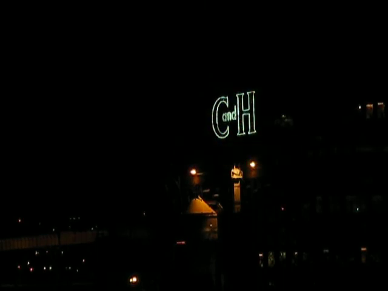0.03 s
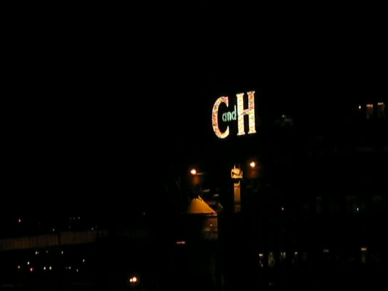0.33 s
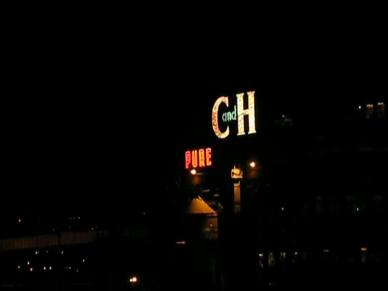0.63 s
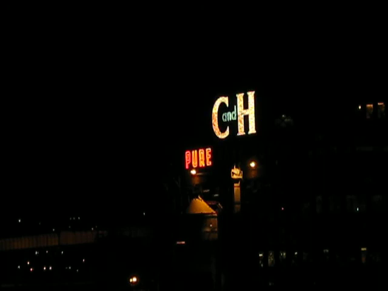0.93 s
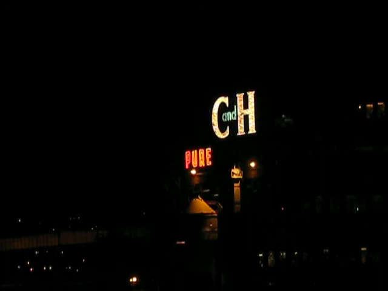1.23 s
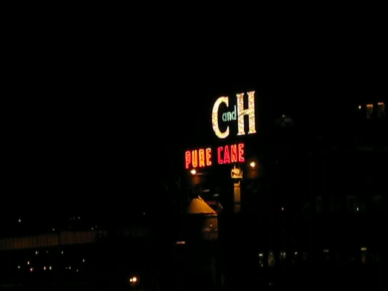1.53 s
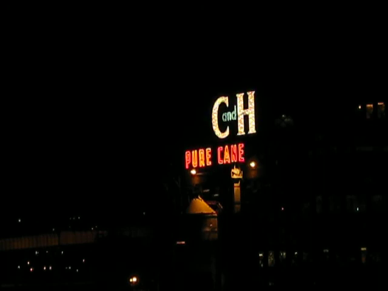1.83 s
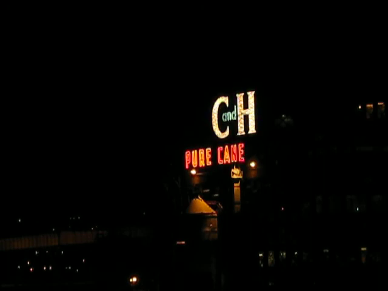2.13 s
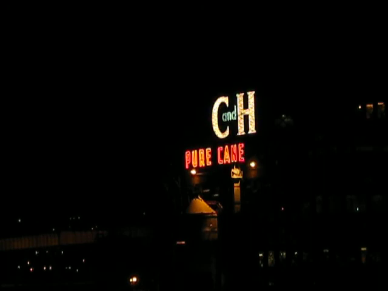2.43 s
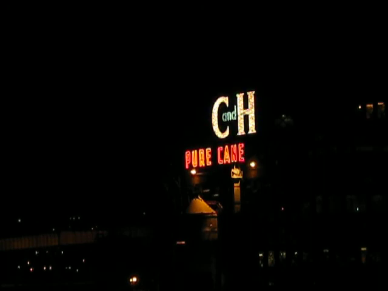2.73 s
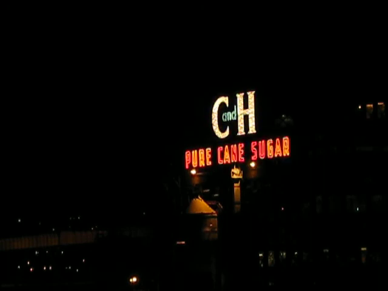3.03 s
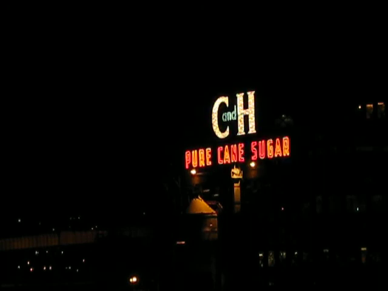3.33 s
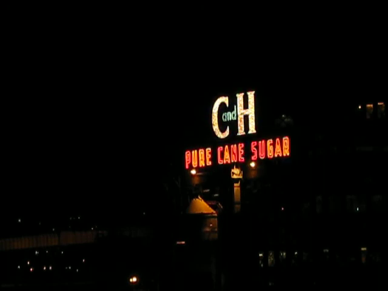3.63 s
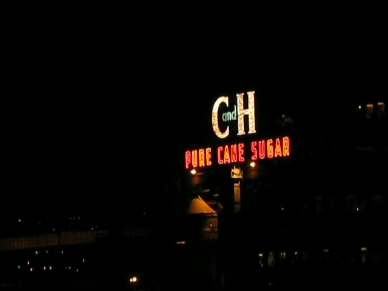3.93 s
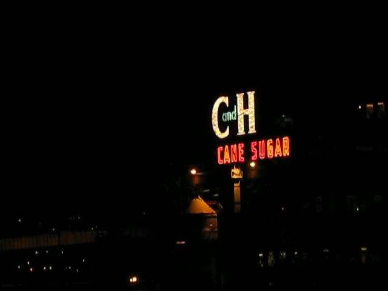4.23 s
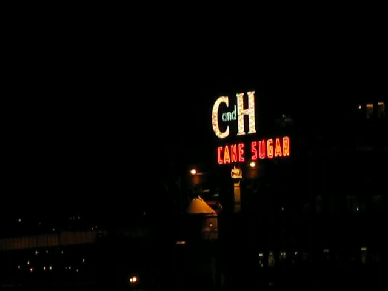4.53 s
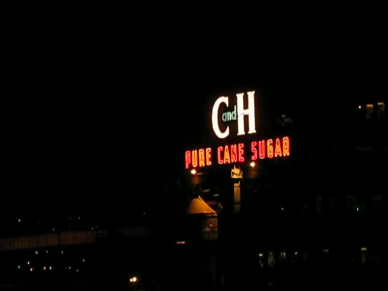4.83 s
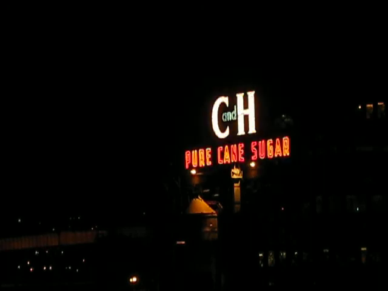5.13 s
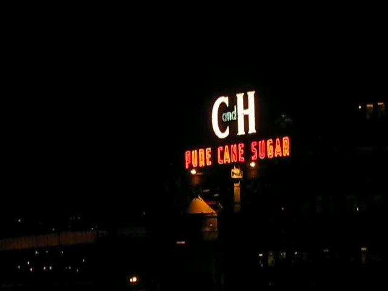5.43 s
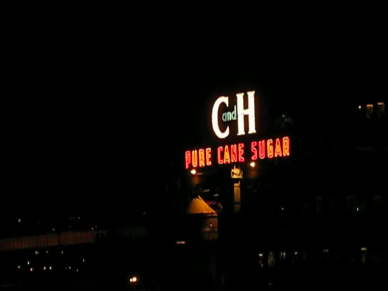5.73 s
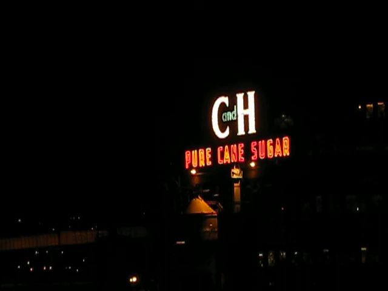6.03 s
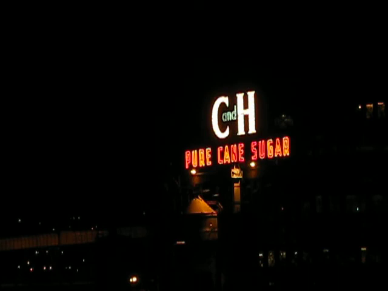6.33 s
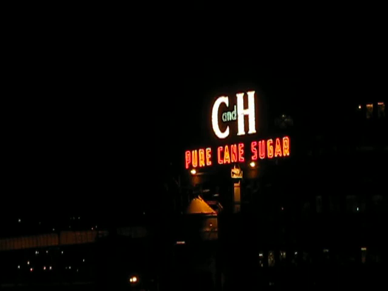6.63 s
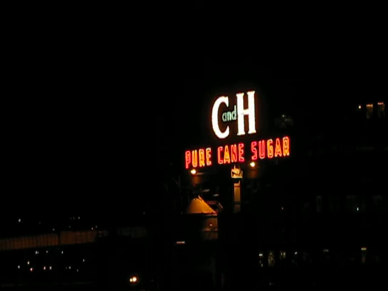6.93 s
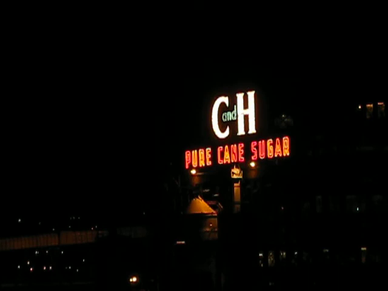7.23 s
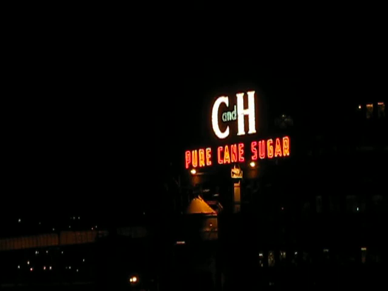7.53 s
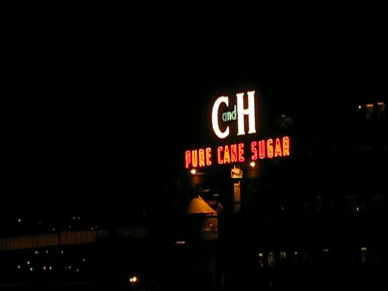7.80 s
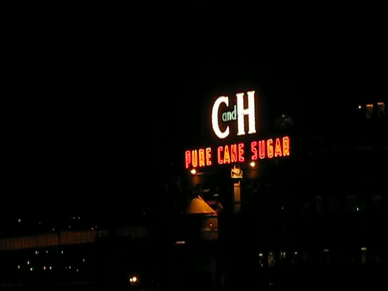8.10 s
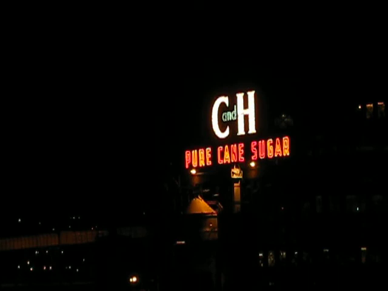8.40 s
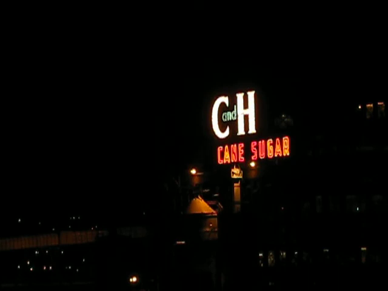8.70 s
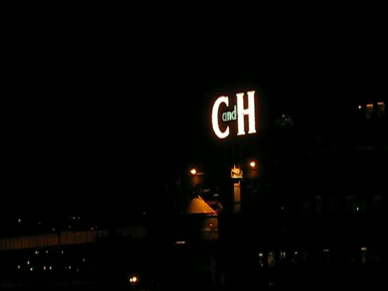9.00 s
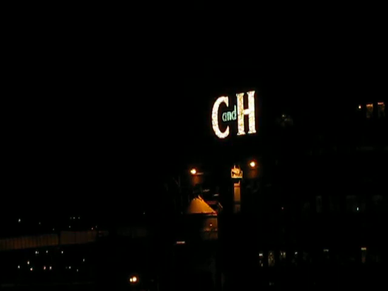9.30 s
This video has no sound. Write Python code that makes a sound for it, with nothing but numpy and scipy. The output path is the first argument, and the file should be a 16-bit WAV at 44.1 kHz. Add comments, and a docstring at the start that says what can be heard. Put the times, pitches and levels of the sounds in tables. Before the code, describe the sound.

A close camera motor whines steadily over a low distant rush of machinery and traffic, with a few faint clicks.

```python
"""Outdoors at night, a factory in the distance, heard from a hand-held tape camera.
Close to the microphone the camera's two motors whine over the rubbing of its gears and tape.
A low beating hum, probably the camera's drive, lies over the dull rush of far plant and traffic.
The plastic case ticks now and then, the picture scan leaks a faint buzz, and the microphone hisses."""
import sys
import numpy as np
from scipy import signal
from scipy.fft import rfft, irfft, next_fast_len
from scipy.io import wavfile
from scipy.ndimage import map_coordinates

SR = 44100
rng = np.random.default_rng(int(sys.argv[2]) if len(sys.argv) > 2 else 0)


def unload_audio(sound):
    """Save the sound as a 16-bit wav file, at the path given as the first command line argument."""
    columns = np.transpose(np.atleast_2d(sound))
    # keep every value between -1 and 1, then stretch to whole-number steps
    steps = np.round(np.clip(columns, -1, 1) * 32767)
    wavfile.write(sys.argv[1], SR, steps.astype(np.int16))


N = 412776


# steady lines: (shaft multiple, level [dB rms])
STEADY_LINES = [(1, -49), (2, -41), (3, -48.5), (4, -45), (5, -52), (8, -51), (9, -40.5), (10, -40),
                (10.5, -45), (11.5, -51), (12.5, -42.5), (16, -46.5), (17, -41), (18, -41.5), (18.5, -48),
                (19, -41), (19.5, -39.6), (20, -48), (21, -51), (24, -48), (25, -51.5)]
# creeping lines: (shaft multiple, start level [dB rms], slope [dB/s])
CREEPING_LINES = [(6, -34.3, -.25), (7, -38, .9), (15, -35, -.5)]
# shaft multiples of the three swelling lines
SWELL_MULTIPLES = (11, 12, 13)
# their levels before flutter: (time [s], low [dB rms], middle [dB rms], high [dB rms])
SWELL_LEVELS = [(0.0, -29, -21.5, -28), (0.4, -29, -25.5, -30.5), (2.0, -30.0, -31.0, -36),
                (2.6, -34, -32, -39), (4.0, -36.0, -29, -32), (4.6, -41.0, -25.5, -26.5),
                (5.2, -35.5, -32.5, -26.5), (5.6, -31, -33.5, -31.0), (6.2, -32, -36.5, -39.5),
                (6.8, -32.5, -32.5, -34.5), (7.6, -37.0, -35, -35.5), (8.6, -33.0, -34.5, -25.5),
                (9.3, -32, -30.5, -25.5)]

def main_motor(shaft_hz=91.245, beat_s=1.406, crest_s=.18, flutter_below_db=-25.5):
    """Lines at multiples of the shaft rate: some creep, one beats, three swell and flutter."""
    t = clock()
    turns = spin(shaft_hz, wow=.00082)
    steady = sum(tone(k * turns, db) for k, db in STEADY_LINES)
    creeping = sum(tone(k * turns, db + db_per_s * t) for k, db, db_per_s in CREEPING_LINES)
    beat = 1 + .5 * np.cos(2 * np.pi * (t - crest_s) / beat_s)
    beating = tone(14 * turns, db=-40) * beat
    times_s, *levels_db = np.transpose(SWELL_LEVELS)
    swelling = 0
    for rank, (k, points_db) in enumerate(zip(SWELL_MULTIPLES, levels_db)):
        db = np.interp(t, times_s, points_db)
        # higher and quieter lines flutter more
        flutter_db = (.09 + .1 * rank) * np.maximum(flutter_below_db - db, 0)
        swelling += tone(k * turns, db + flutter_db * wobble(10))
    return steady + creeping + beating + swelling


# steady lines: (shaft multiple, level [dB rms])
SECOND_MOTOR_LINES = [(1, -54), (2, -44.5), (4, -50), (5, -44.6), (7, -40), (8, -37.5), (10, -51),
                      (11, -38.4), (12, -46), (14, -44), (15, -43.5), (16, -49), (17, -41.5), (18, -45)]

def second_motor(shaft_hz=98.29, ninth_db=-36.5, waver_db=1.9):
    """A slightly faster shaft whose lines beat against the main motor's; the ninth wavers."""
    turns = spin(shaft_hz, wow=.00012)
    ninth = tone(9 * turns, ninth_db + waver_db * wobble(2))
    return ninth + sum(tone(k * turns, db) for k, db in SECOND_MOTOR_LINES)


# gear and tape noise: (frequency [Hz], density [dB/Hz])
GEAR_SPECTRUM = [(200, -92.5), (650, -66), (1150, -60.5), (1450, -65.5), (1850, -63), (2030, -58.5),
                 (2400, -71.5), (2850, -85.5), (3080, -79.5), (3400, -89.5), (3680, -86.5), (4300, -92.5),
                 (5050, -90.5), (6500, -116)]

def gears(teeth_hz=410.6, pulse_depth=.18, waver_db=.84):
    """Rubbing noise that pulses as the teeth mesh."""
    mesh = 1 + pulse_depth * np.sin(2 * np.pi * teeth_hz * clock())
    return noise(GEAR_SPECTRUM) * mesh * amp(waver_db * wobble(8))


# case ticks: (time [s], relative level [dB], ring t60 [s], favoured pitch [Hz])
CASE_TICKS = [(.2696, -12.5, .0095, 4480), (.299, -38.5, .045, 2650), (2.0004, -43, .045, 4100),
              (3.994, -21, 0.029, 3100), (4.2835, -36, .03, 3950), (4.6405, -38, .03, 4300),
              (5.354, -34, .024, 4660), (6.256, -28.5, 0.021, 4700), (6.8047, -28.5, 0.025, 4100),
              (7.109, -41, .03, 3800), (8.482, -34.5, 0.048, 5780), (8.804, -39, .02, 4330)]
# case modes: (frequency [Hz], relative level [dB])
CASE_MODES = [(2080, -7.5), (2230, 7.5), (2620, 6.5), (3100, 1), (3550, -1.5), (3800, -3), (4130, -11.5),
              (4330, -6.5), (4660, -5.5), (5550, -26.5), (5980, -19)]

def case_ticks(gain_db=1, favoured_db=4, crack_db=-10, attack_s=.0003, tail_db=-16, tail_t60_s=.13):
    """Hard plastic gives a little: a crack, brief modes and a weak after-ring."""
    out = np.zeros(N + SR)
    t = np.arange(SR // 5) / SR
    crack_band = signal.butter(2, [2000, 5000], "band", fs=SR, output="sos")
    faint_ticks = [(rng.uniform(0, N / SR), -42.5, .02, rng.uniform(3800, 6000)) for _ in range(4)]
    for start_s, db, t60_s, favoured_hz in CASE_TICKS + faint_ticks:
        ring = 0
        for hz, mode_db in CASE_MODES:
            # modes near the favoured pitch are pulled toward favoured_db, colouring each tick
            nearness = np.exp(-(np.log(hz / favoured_hz) / .08) ** 2)
            ring_db = mode_db + (favoured_db - mode_db) * nearness + rng.standard_normal()
            ring += tone(hz * t, ring_db)
        crack = signal.sosfilt(crack_band, rng.standard_normal(len(t)))
        tick = unit(ring) + amp(crack_db) * unit(crack)
        tail_share = min(t60_s / .026, 1) ** 2  # short snaps leave less after-ring
        tail = tail_share * amp(tail_db - 60 * t / tail_t60_s)
        envelope = (amp(-60 * t / t60_s) + tail) * (1 - np.exp(-t / attack_s))
        out[round(start_s * SR):][:len(t)] += amp(db + gain_db) * envelope * tick
    soft_contact = signal.butter(2, 8000, fs=SR, output="sos")
    return signal.sosfilt(soft_contact, out[:N])


# hum tones: (frequency [Hz], level [dB rms])
HUM_TONES = [(113, -52), (164.9, -44), (168.2, -43.5), (329.7, -45.5), (332.4, -50), (505.4, -51.5)]

def low_hum():
    """Low tones, probably the camera's drive; the close pairs beat."""
    return sum(tone(hz * clock() + .015 * wobble(2), db) for hz, db in HUM_TONES)


# far plant and traffic: (frequency [Hz], density [dB/Hz])
RUSH_SPECTRUM = [(20, -87), (38, -82.5), (52, -73), (65, -70.5), (88, -67), (130, -63.5), (320, -62),
                 (500, -63), (900, -72.5), (2000, -93), (4000, -120)]

def distant_rush(waver_db=.07):
    """Far plant and traffic merge into a dull, nearly steady noise."""
    return noise(RUSH_SPECTRUM) * amp(-waver_db * wobble(3.3))


def scan_buzz(scan_hz=59.94, pip_hz=6786, width_s=.0005):
    """Each picture scan leaks a short high pip with a sharp edge, strong and weak in turn."""
    def pip(t, hz, width_s):
        return np.exp(-(t / width_s) ** 2) * np.cos(2 * np.pi * hz * t)

    def leak(t):
        edge = amp(-48) * pip(t + width_s, hz=7500, width_s=.00012)
        body = amp(-42.5) * pip(t, pip_hz, width_s)
        echo = amp(-53) * pip(t - .0019, pip_hz, 2 * width_s)
        return edge + body + echo

    cycle_s = clock() % (2 / scan_hz)
    return leak(cycle_s - .0033) + amp(-4.5) * leak(cycle_s - .0197)


# microphone hiss: (frequency [Hz], density [dB/Hz])
HISS_SPECTRUM = [(1000, -103), (9500, -104.5), (12000, -105.5), (15500, -111)]

def microphone_hiss():
    """The microphone's steady noise floor."""
    return noise(HISS_SPECTRUM)


def spin(hz, wow, wow_hz=3.3, drift=.00008):
    """Turns of a governed shaft: an off-centre wheel and slow drift bend its speed."""
    wheel = np.sin(2 * np.pi * (wow_hz * clock() + rng.random()))
    speed = 1 + wow * wheel + drift * wobble(1.52)
    return np.cumsum(hz * speed) / SR


def tone(turns, db):
    """Sine at db rms that follows a count of turns, from a random phase."""
    return np.sqrt(2) * amp(db) * np.sin(2 * np.pi * (turns + rng.random()))


def noise(spectrum):
    """Noise from rows of (frequency [Hz], density [dB/Hz])."""
    points_hz, points_db = np.transpose(spectrum)
    white = rng.standard_normal(N) * np.sqrt(SR / 2)
    return filtered(white, lambda hz: amp(np.interp(np.log(hz + 1), np.log(points_hz), points_db)))


def filtered(x, response):
    """x through the gain curve response(hz)."""
    size = next_fast_len(N + SR // 2)
    hz = np.fft.rfftfreq(size, 1 / SR)
    return irfft(rfft(x, size) * response(hz), size)[:N]


def wobble(knots_per_s):
    """Smooth random curve, rms about 1."""
    knots = rng.standard_normal(int(N * knots_per_s / SR) + 4)
    return map_coordinates(knots, [clock() * knots_per_s])


def clock():
    """Sample times [s]."""
    return np.arange(N) / SR


def amp(db):
    """Decibels to gain."""
    return 10 ** (np.asarray(db) / 20)


def unit(x):
    """Scale to rms 1."""
    return x / np.sqrt(np.mean(x ** 2) + 1e-20)


def scene():
    """All sources at one microphone."""
    drive = main_motor() + second_motor() + gears()
    return (drive + case_ticks() + low_hum() + distant_rush() + scan_buzz() + microphone_hiss())[None]


def record(dry):
    """The camera notches the treble and keeps nothing above its band limit."""
    notch_hz, half_width_hz, depth, top_hz = 7900, 380, .88, 15720
    notch = lambda hz: 1 - depth / (1 + ((hz - notch_hz) / half_width_hz) ** 2)
    return filtered(dry[0], lambda hz: notch(hz) * (hz < top_hz))[None]


dry = scene()
out = record(dry)
unload_audio(out)
```